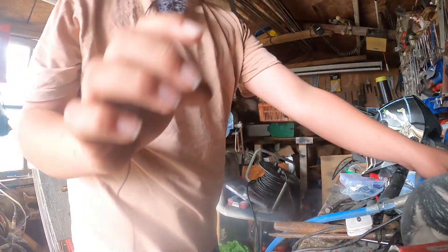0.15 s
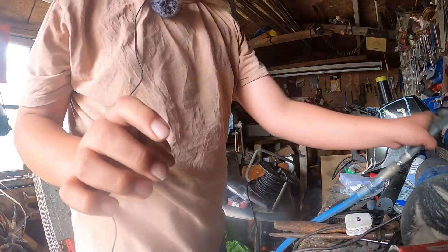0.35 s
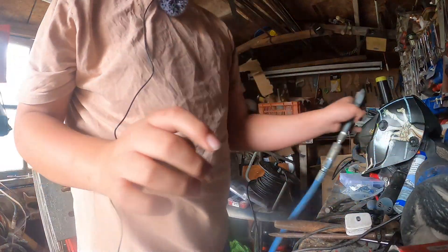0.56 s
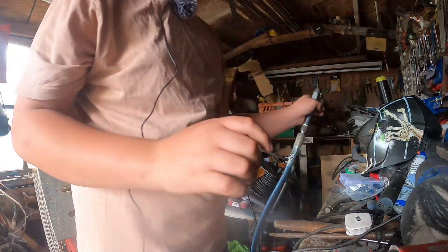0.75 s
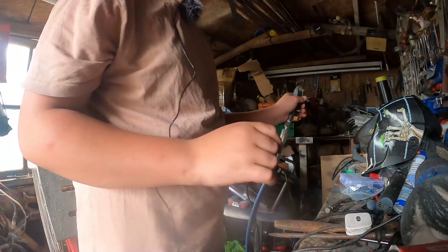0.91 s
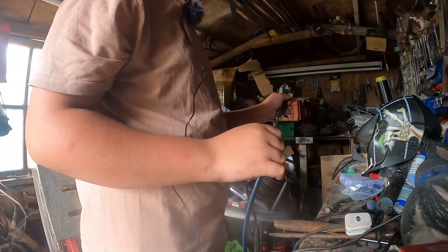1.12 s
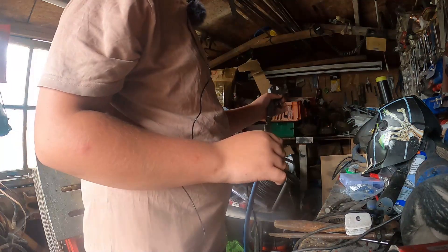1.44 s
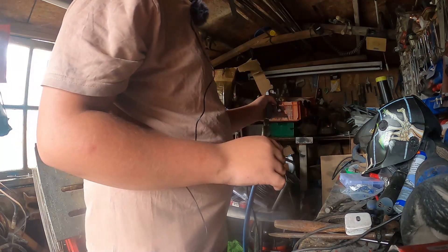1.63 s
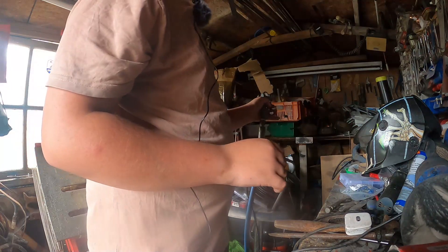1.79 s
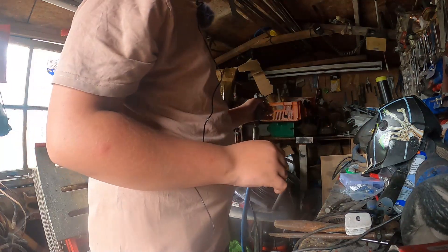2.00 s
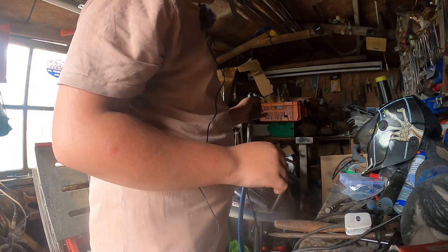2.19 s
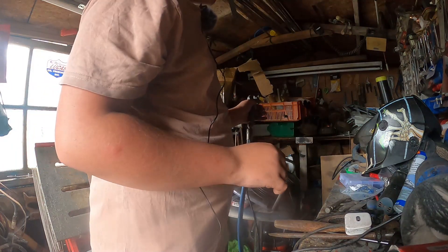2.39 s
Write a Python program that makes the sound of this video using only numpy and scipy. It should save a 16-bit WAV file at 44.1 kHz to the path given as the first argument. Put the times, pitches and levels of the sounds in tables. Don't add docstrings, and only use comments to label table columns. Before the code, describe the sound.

An air compressor runs without pause, a rough low motor buzz that grows clearer and brighter after a second

```python
import sys
import numpy as np
from scipy import signal
from scipy.fft import irfft, next_fast_len
from scipy.io import wavfile
from scipy.ndimage import uniform_filter1d

SR = 44100
rng = np.random.default_rng(int(sys.argv[2]) if len(sys.argv) > 2 else 0)


def pcm_store(signal):
    levels = np.round(np.clip(np.atleast_2d(signal), -1, 1) * 32767)
    wavfile.write(sys.argv[1], SR, levels.astype(np.int16).T)


def field_ratio(decibels):
    return 10 ** (np.asarray(decibels, dtype=float) / 20)


N = 112454


def unit(x):
    return x / np.sqrt(np.mean(x ** 2))


def walk(rate):
    hold = int(SR / rate)
    steps = np.repeat(rng.standard_normal(N // hold + 1), hold)
    return 1.17 * uniform_filter1d(uniform_filter1d(steps, hold), hold)[:N]


def band(hz, width):
    size = next_fast_len(N)
    f = np.arange(size // 2 + 1) * SR / size
    real, imaginary = rng.standard_normal((2, len(f)))
    resonance = 1 / (1 + ((f - hz) / (width / 2)) ** 2)
    return unit(irfft((real + 1j * imaginary) * resonance, size)[:N])


def crank_turns(t):
    # time in seconds, crank rate in Hz
    crank = [
        (0.05, 70.1),
        (0.79, 70.1),
        (1.54, 69.45),
        (1.61, 69.72),
        (2.5, 69.18),
    ]
    s, hz = np.array(crank).T
    start_turns = -0.49
    return start_turns + np.cumsum(np.interp(t, s, hz)) / SR


def facing_curve(t, at):
    turn_len_s = 0.17
    return 0.5 + 0.5 * np.tanh((t - at) / turn_len_s)


def stroke_phase(k):
    ring_orders = (1.5, 2.5, 3.5, 7.5, 12.5)
    ring_shift = np.pi * np.array([4 / 6, 3 / 6, -4 / 6, 3 / 4, 2 / 6])
    phase = np.pi + sum(shift * (k > order) for order, shift in zip(ring_orders, ring_shift))
    if k > 9 and k % 2 == 0:
        phase -= np.pi / 2
    if k > 16:
        phase += 2 * np.pi * rng.random()
    return phase


def piston(t, turns, turn):
    # multiple of the crank rate, level in dB facing away from the machine
    away_levels = [(1, 1), (2, -9), (3, -20.5), (4, 0), (5, -4.5), (6, 3), (7, 3), (8, -10), (9, -6),
                   (10, -13), (11, -8), (12, -13), (13, 2), (14, -34.5), (15, -8), (16, -20.5), (17, -18),
                   (18, -17), (19, -25), (20, -19.5), (21, -17.5), (22, -36.5), (23, -17), (24, -24.5),
                   (25, -22), (26, -16.5), (27, -17)]
    # multiple of the crank rate, level in dB facing the machine
    facing_levels = [(1, -2.5), (2, -16.5), (3, -26), (4, -5.5), (5, -7.5), (6, -1), (7, 2), (8, -15.5),
                     (9, -10), (10, -15.5), (11, -19.5), (12, -14.5), (13, -4.5), (14, -28), (15, -7.5),
                     (16, -13.5), (17, -11), (18, -23.5), (19, -19), (20, -21.5), (21, -52), (22, -23),
                     (23, -51), (24, -19.5), (25, -25), (26, -33.5), (27, -24.5)]
    away = np.array(away_levels)[:, 1] - 45
    facing = np.array(facing_levels)[:, 1] - 41.5
    wobble_db, jitter = 0.46, 0.017
    rattle_db, rattle_fade_db, rattle_turn_db, rattle_spread_db = -69, -0.0346, 2, 3
    swell_db, swell_s, swell_len_s = 1, 1.05, 0.37

    late = jitter * walk(30.54) / 10
    out = 0
    for k in range(1, 70):
        if k <= len(away):
            db = away[k - 1] + (facing[k - 1] - away[k - 1]) * turn
            db = db + wobble_db * np.sqrt(k - 1) / 2 * walk(9.04)
        else:
            db = rattle_db + rattle_fade_db * (k - len(away))
            db = db + rattle_turn_db * turn + rattle_spread_db * walk(3.96)
        angle = 2 * np.pi * k * (turns + late * (k > 1))
        out = out + field_ratio(db) * np.sin(angle + stroke_phase(k))
    swell = field_ratio(swell_db * np.exp(-((t - swell_s) / swell_len_s) ** 2))
    return swell * np.sqrt(2) * out


def hiss(turns, bright):
    # frequency in Hz, density in dB per Hz
    spectrum = [(40, -27), (180, -55), (400, 4.5), (900, 0.5), (1500, -7.5), (3600, -2.5), (5800, -12),
                (13000, -19)]
    # frequency in Hz, width in Hz, level in dB facing away, level in dB facing
    housing = [(907, 200, -56, -52.5), (1242, 115, -53.5, -54.5), (1930, 360, -58, -58),
               (2400, 67, -60, -63.5), (2830, 140, -56, -68), (3680, 460, -56.5, -56.5),
               (4080, 580, -60.5, -53.5), (4680, 620, -65.5, -58.5), (8060, 160, -76, -68.5),
               (12730, 60, -92, -76), (12300, 1900, -80, -67)]
    hiss_db, hiss_turn_db, puff_db, flicker_db = -46, 1, 0, 0.5
    ring_puff_db, ring_waver_db = 2, 1.3
    top_hz = 13360

    hzs, dbs = np.array(spectrum).T
    air = 0
    for hz in 40 * 2 ** np.arange(0, 8.7, 0.5):
        db = np.interp(np.log(hz), np.log(hzs), dbs) + 10 * np.log10(hz)
        puff = puff_db * np.cos(4 * np.pi * turns + np.log(hz)) * (hz > 600)
        db = db + puff + hiss_turn_db * bright * (hz > 800) + flicker_db * walk(5.83)
        air = air + field_ratio(db) * band(hz, hz * 0.62)

    rings = 0
    for hz, width, away, facing in housing:
        puff = ring_puff_db * np.cos(4 * np.pi * turns + np.log(hz))
        db = away + (facing - away) * bright + ring_waver_db * walk(7.1) + puff
        rings = rings + field_ratio(db) * band(hz, width)
    lowpass = signal.butter(4, top_hz, fs=SR, output="sos")
    return signal.sosfilt(lowpass, field_ratio(hiss_db) * unit(air) + rings)


def motor(t, turns):
    # time in seconds, level in dB
    whistle_levels = [
        (0, -62),
        (.15, -74),
        (.6, -68),
        (.9, -52),
        (1.15, -53),
        (1.5, -70),
        (1.9, -54),
        (2.15, -62),
        (2.3, -50.5),
        (2.55, -60),
    ]
    # time in seconds, level in dB
    whine_levels = [
        (0, -88),
        (1.3, -80),
        (1.45, -64),
        (1.6, -61),
        (1.9, -58),
        (2.05, -62),
        (2.15, -68),
        (2.4, -67),
        (2.55, -73),
    ]
    gear, shaft_db = 4.772, -53
    whistle_hz, whistle_drift_hz, whistle_flicker_db = 4022, 14, 3.5
    whine_hz, whine_sag_hz_per_s, whine_rough_db = 8368, 35, 1.5

    shaft = field_ratio(shaft_db + 0.4 * walk(5)) * np.sin(2 * np.pi * gear * turns)

    whistle_turns = np.cumsum(whistle_hz + whistle_drift_hz * walk(25.05)) / SR
    whistle_db = np.interp(t, *np.array(whistle_levels).T) + whistle_flicker_db * walk(30.08)
    whistle = field_ratio(whistle_db) * np.sin(2 * np.pi * whistle_turns)

    whine_turns = whine_hz * t - whine_sag_hz_per_s * t ** 2 / 2
    whine_db = np.interp(t, *np.array(whine_levels).T) + whine_rough_db * walk(9.8)
    whine = field_ratio(whine_db) * np.sin(2 * np.pi * whine_turns)
    return np.sqrt(2) * (shaft + whistle + whine)


def handling(t):
    return field_ratio(-86 - 2 * t + 3 * walk(3)) * band(28, 17)


def channel_difference(t):
    # start in seconds, length in seconds
    apart_times = [
        (0, .02),
        (.2, .31),
        (.6, .07),
        (.82, .11),
        (1.69, .08),
        (2.23, .32),
    ]
    # frequency in Hz, level in dB
    side_levels = [(1500, -87), (2500, -81), (4500, -80.5), (8000, -83), (11000, -88)]
    hum_db, rest_db, patchy_db = -91, -19.5, 5

    apart = sum((t >= at) & (t < at + span) for at, span in apart_times)
    patches = 0
    for hz, db in side_levels:
        for part in (0.8, 1, 1.2):
            patches = patches + field_ratio(db + patchy_db * walk(30.05)) * band(hz * part, hz / 6)
    hum = field_ratio(hum_db + 3.5 * walk(7.75)) * band(185, 64)
    return field_ratio(rest_db * (1 - apart)) * patches + hum


def scene():
    t = np.arange(N) / SR
    turns = crank_turns(t)
    bright = facing_curve(t, 0.78)
    turn = facing_curve(t, 0.96)
    mid = piston(t, turns, turn) + hiss(turns, bright) + motor(t, turns) + handling(t)
    side = channel_difference(t)
    return np.array([mid + side, mid - side])


def top_cut(x):
    return signal.sosfilt(signal.butter(12, 15640, fs=SR, output="sos"), x)


def record(dry):
    return top_cut(dry)


dry = scene()
out = record(dry)
pcm_store(out)
```